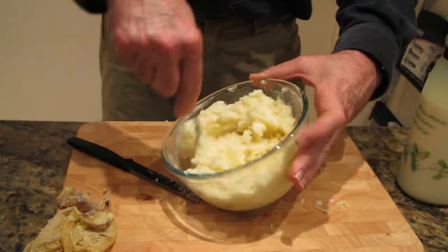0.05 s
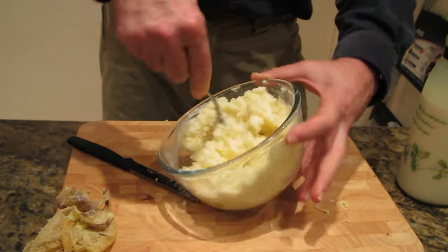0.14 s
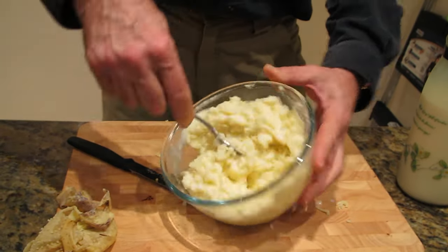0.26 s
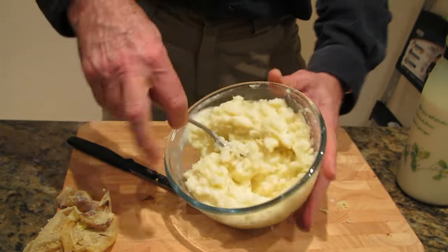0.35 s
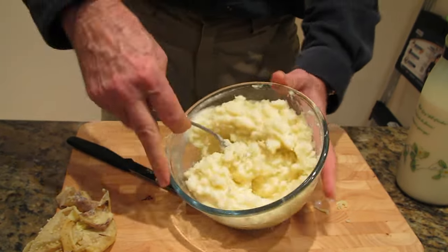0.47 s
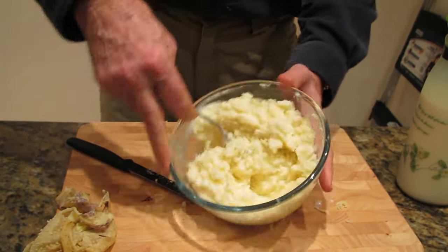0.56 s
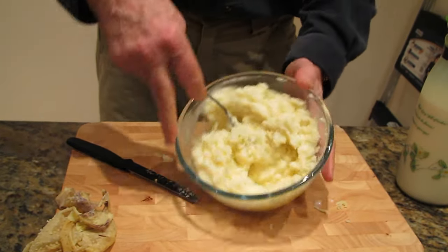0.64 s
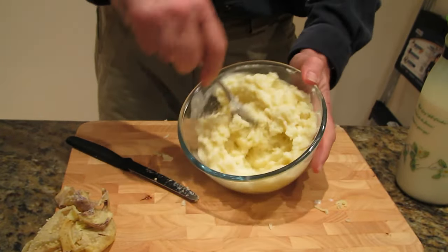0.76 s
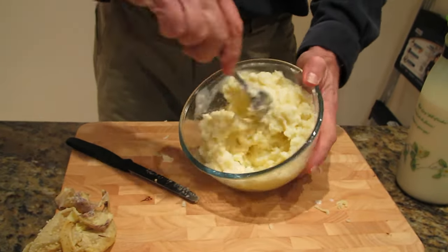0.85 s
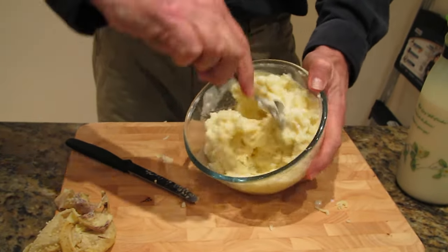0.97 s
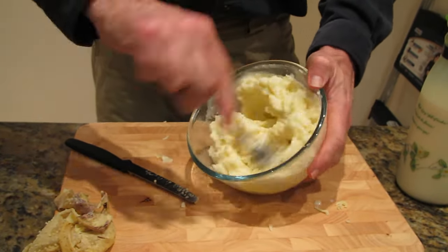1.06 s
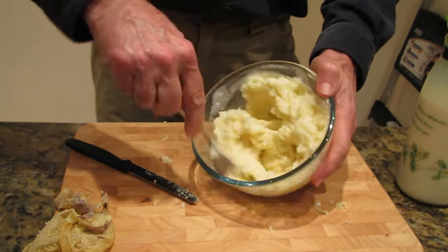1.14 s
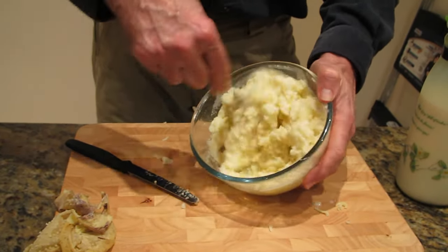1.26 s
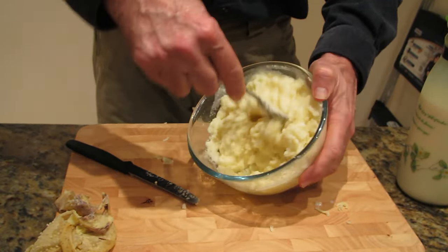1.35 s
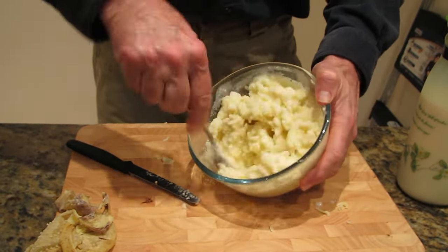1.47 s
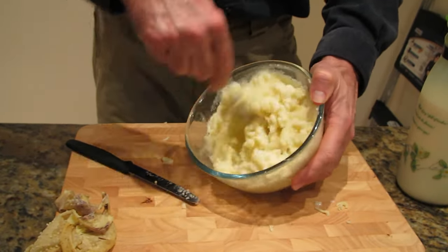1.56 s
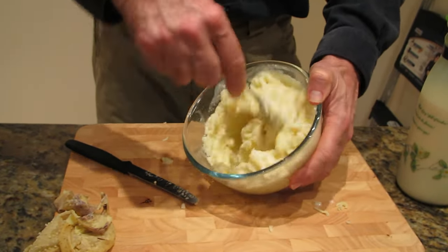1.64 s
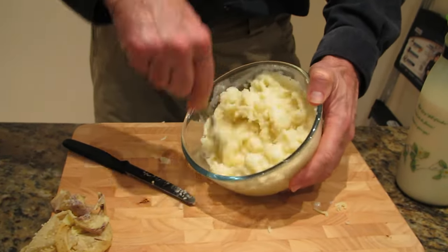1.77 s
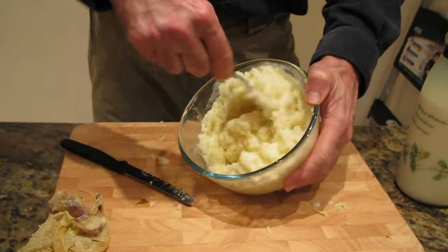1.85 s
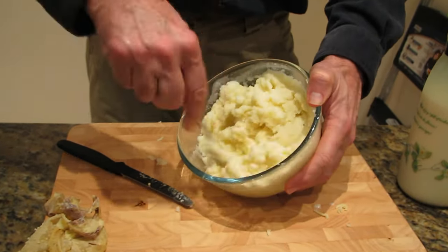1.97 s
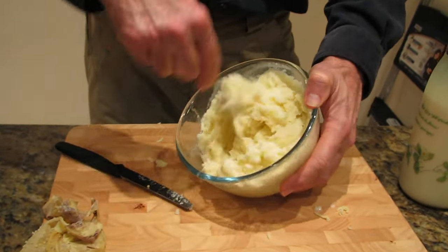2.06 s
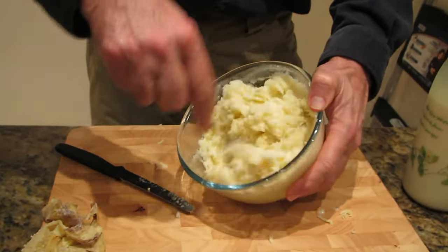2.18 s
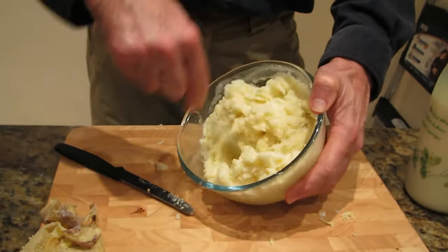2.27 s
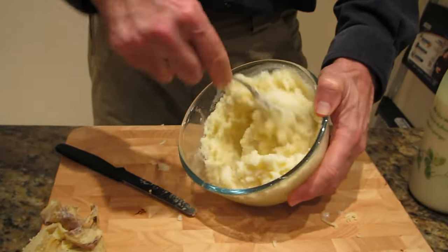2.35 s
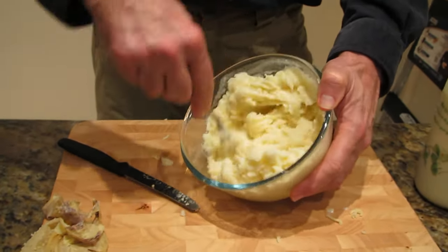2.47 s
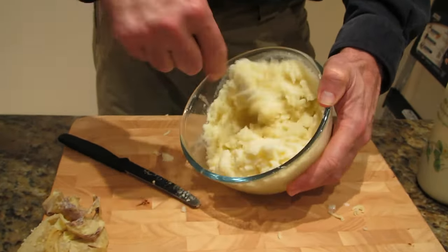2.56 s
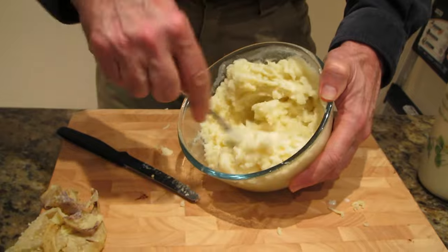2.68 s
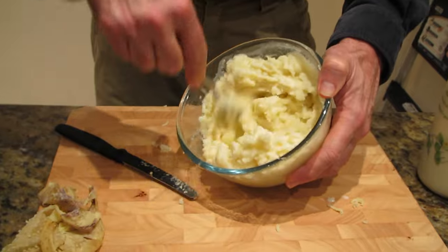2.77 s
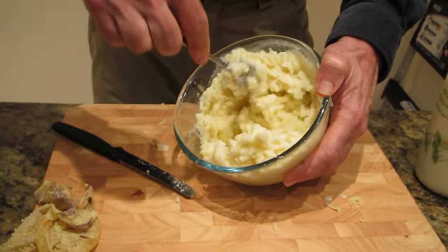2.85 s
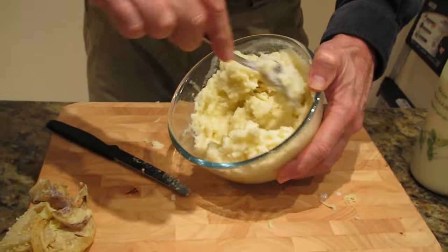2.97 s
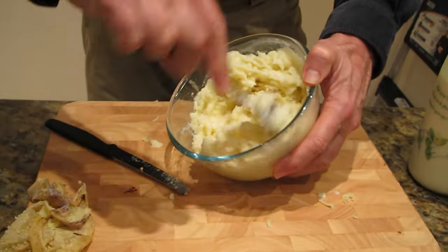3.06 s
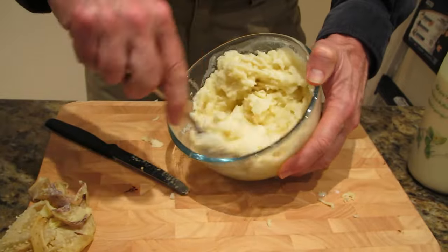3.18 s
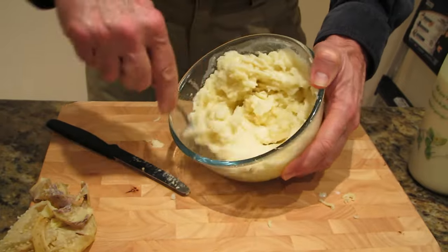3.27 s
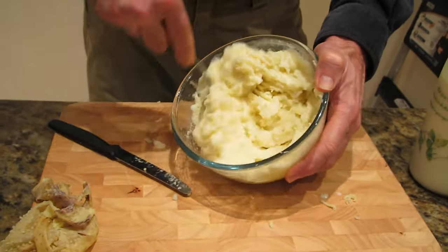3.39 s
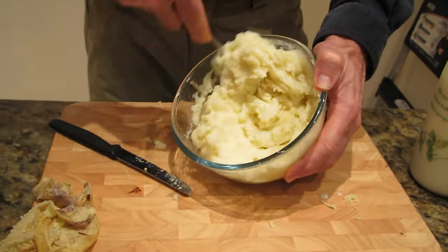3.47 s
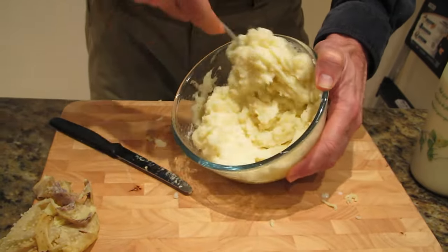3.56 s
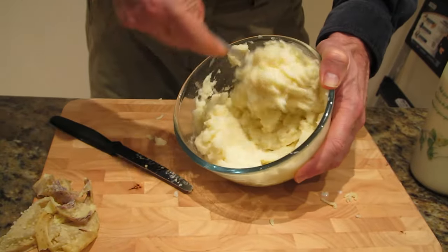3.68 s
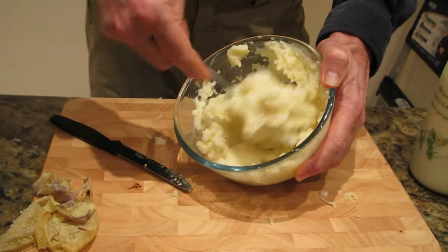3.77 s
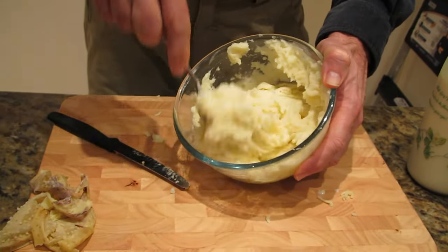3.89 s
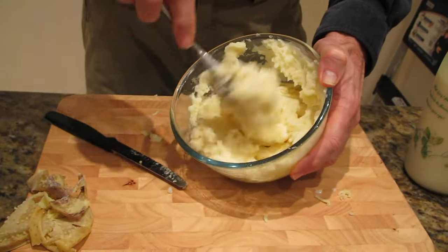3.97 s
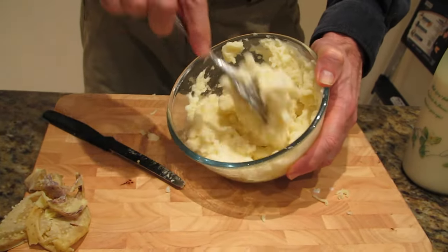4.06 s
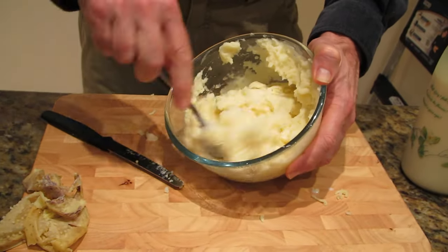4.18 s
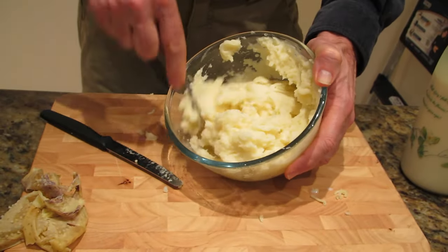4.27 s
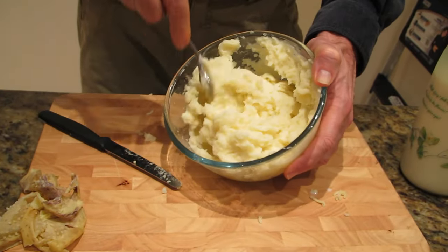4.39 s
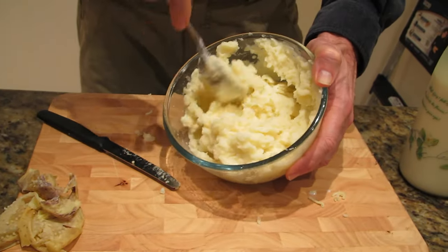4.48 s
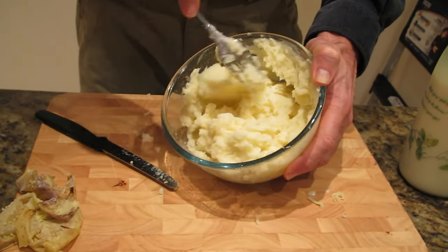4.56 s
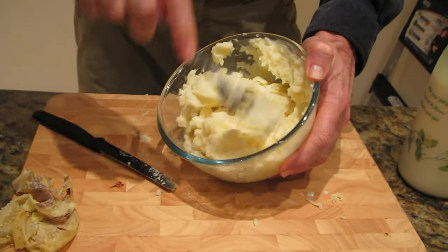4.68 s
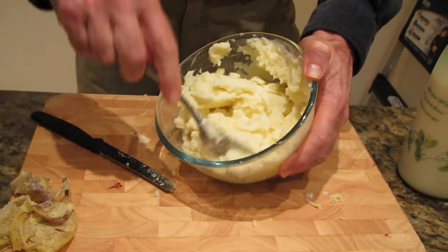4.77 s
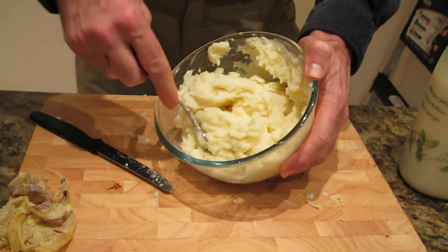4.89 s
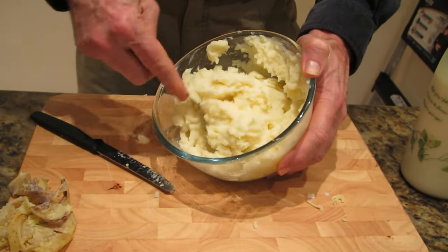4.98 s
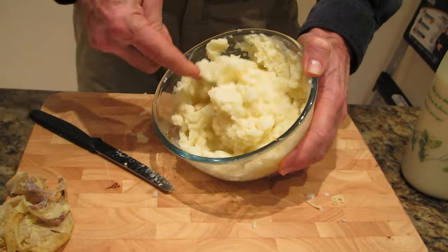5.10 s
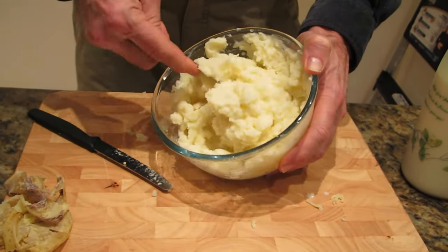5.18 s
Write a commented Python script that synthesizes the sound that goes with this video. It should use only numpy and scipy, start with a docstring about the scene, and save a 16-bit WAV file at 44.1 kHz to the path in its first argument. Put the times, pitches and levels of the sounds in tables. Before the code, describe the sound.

Close view of a fork stirring mashed potato in a glass bowl. Two light clinks open, a brief rumble of the bowl on a wooden board follows, then about fourteen strong, ringing clinks with scrapes come in quick irregular succession. After a short gap, softer knocks and scrapes give way to wet ticks, a small late cluster and one final weak tap. Hard, lively kitchen, faint air noise and hum.

```python
"""In a hard, echoing kitchen with steady air noise and a humming appliance, a steel fork beats mashed potato
in a hand-held glass bowl. Each blow is a short rattle and bite that sets glass and steel ringing.
Scrapes are rough noise sent through the same kind of resonances, with two gliding tones on top.
The mash ticks and crackles with short damped sines; the bowl's foot rolls on a wooden board as bumpy noise.
"""
import sys
import numpy as np
from scipy import signal
from scipy.fft import rfft, irfft, next_fast_len
from scipy.io import wavfile
from scipy.ndimage import map_coordinates

SR = 44100
rng = np.random.default_rng(int(sys.argv[2]) if len(sys.argv) > 2 else 0)


def store_wav(level_fs):
    """Save 16-bit WAV to argv[1]."""
    pcm = np.round(np.clip(np.atleast_2d(level_fs), -1, 1) * 32767)
    wavfile.write(sys.argv[1], SR, pcm.T.astype(np.int16))


N = 230686  # length in samples, about 5.2 s

# Steady noise of the kitchen, its tone: (frequency [Hz], relative level per Hz [dB])
AIR_TONE = [(15, -52), (30, -24), (90, -19), (130, -11.5), (230, -8.5), (500, -7), (760, -3.5), (900, -8),
            (2300, -14), (3300, -18.5), (4500, -33), (9000, -28.5), (16000, -36)]
# How that noise swells a little: (time [s], level [dB])
AIR_SWELL = [(0, -52.5), (.45, -56), (1, -50), (4.6, -53.5), (5.23, -52.5)]
# Hum of the appliance's motor: (frequency [Hz], rms level [dB])
MOTOR_HUM = [(145.3, -68), (199.2, -72), (247.6, -65), (737.5, -69)]
# How alike far sound is at left and right: (frequency [Hz], likeness [0 to 1])
LEFT_RIGHT_LIKENESS = [(100, 0.47), (250, 0.75), (600, 0.83), (2000, 0.62), (4500, 1), (9000, 0.32),
                       (14000, .3)]
# Echoes of the kitchen: (frequency [Hz], time to fall 60 dB [s], echo level [dB])
KITCHEN_ECHO = [(150, 0.19, 4), (470, 0.79, -3), (680, 0.63, 2), (918, 0.69, 0), (1140, 0.54, -0.5),
                (2930, 0.48, -5), (8100, 0.37, -5.5), (14900, 0.42, -9.5)]

# The bowl's foot rolling on the board: (time [s], level [dB])
ROLL_LEVEL = [(.5, -64), (0.559, -40), (.62, -39.5), (.66, -34.5), (.7, -46), (.8, -53.5), (.88, -75),
              (1.0, -69)]
# Jolts of the foot: (time [s], level at the top of the jolt [dB])
JOLTS = [(.395, -48), (0.788, -37)]
JOLT_DB_PER_S = 900  # how fast a jolt comes and goes
# Resonances of the wooden board: (frequency [Hz], width [Hz], level [dB])
BOARD_MODES = [(188, 14, 3.5), (363, 54, 4), (635, 340, -7.5), (910, 197, -5), (1390, 480, -15)]

# Wet ticks as the mash lets go of fork and glass: (time [s], starting level [dB], pitch [Hz])
WET_TICKS = [(0.408, -34.5, 3520), (0.5518, -31.5, 8600), (0.6976, -32, 10000), (0.8843, -34, 5580),
             (0.9662, -36, 9800), (2.879, -31, 7500), (3.111, -17.5, 9700), (3.223, -24, 9100),
             (3.4812, -22, 3380), (3.5112, -20.5, 3100), (3.5259, -21, 10300), (3.534, -32, 4900),
             (3.5727, -23.5, 3180), (3.5853, -26, 9160), (3.612, -22, 7700), (3.665, -29, 7370),
             (3.7322, -31, 9800), (3.7833, -29.5, 3240), (3.8078, -27, 1770), (3.8786, -26, 4100),
             (3.8885, -24, 3800), (3.917, -22.5, 8700), (3.9809, -25, 12100), (4.0263, -26, 8200),
             (4.1056, -34, 10900), (4.1205, -26, 5300), (4.1276, -16.5, 9000), (4.351, -25.5, 3580),
             (4.372, -34, 3480), (4.4722, -35, 9490), (4.658, -42, 2990), (4.6943, -27, 9800),
             (4.751, -22, 11100), (4.7564, -24.5, 8450), (4.8297, -29, 8400), (4.8835, -35, 4450),
             (5.0102, -26, 3000), (5.0602, -28, 5400), (5.13, -30, 5400)]
# Faint wet crackle of the mash: (time [s], level [dB])
CRACKLE_LEVEL = [(0, -65.5), (.9, -66.5), (1.05, -47.5), (2.7, -50.5), (3.0, -66.5), (3.4, -43.5),
                 (3.6, -50), (3.85, -58.5), (4.05, -65), (4.35, -58), (4.5, -61), (4.6, -72), (4.78, -64),
                 (4.85, -50), (4.93, -65.5), (5.03, -48.5), (5.12, -64), (5.23, -57)]

# Resonances of bowl and fork, six groups: (frequency [Hz], width [Hz], level within the group [dB])
BODY_MODES = [(201, 80, -9.5), (351.4, 153, -3.5), (418.7, 77, 1), (462.4, 26.3, -0.5), (561.3, 33, -6)]  # the damped bowl as a whole
BELLY_MODES = [(615, 38, 0), (735, 59, -1.5), (871.6, 76, 0), (1100, 160, -8)]  # lower side of the bowl
WALL_MODES = [(1398, 122, -1), (1885, 265, 0), (2474, 91, 0)]
LIP_MODES = [(2620, 172, -2.5), (3200, 534, -5)]
TINE_MODES = [(4890, 1520, -2), (5210, 365, 3), (6180, 550, -5.5)]
RIM_MODES = [(7750, 5000, -16.5), (9140, 585, -1.5), (9320, 1200, -7.5), (11420, 2640, -13.5),
             (12000, 3170, -10.5)]
# Higher resonances of the fork, heard when it drags: (frequency [Hz], width [Hz], level [dB])
SHANK_MODES = [(7710, 1300, 1.5), (10600, 590, 7.5), (12700, 3700, -6.5)]

# Strokes of the fork along the glass: (start [s], swell [s], fade [s], glass level [dB],
# steel level [dB], hollow level [dB], hollow pitch at start [Hz], hollow pitch at end [Hz])
SCRAPE_STROKES = [(.03, 0.022, 0.16, -72, -61, -55, 892, 800),
                  (1.059, 0.012, 0.032, -40, -64, -36, 912, 900),
                  (1.124, 0.0071, 0.12, -33, -36.5, -42, 1200, 1102),
                  (1.461, 0.02, 0.078, -27, -30, -30.5, 1388, 999),
                  (1.72, 0.029, 0.065, -47.5, -43, -41.5, 754, 699),
                  (1.97, 0.027, 0.12, -31.5, -34, -47, 803, 1210),
                  (2.21, 0.043, 0.064, -30.5, -33.5, -42.5, 1117, 1113),
                  (2.454, 0.026, 0.014, -61, -39, -30.5, 1028, 966),
                  (3.08, 0.043, 0.098, -43.5, -48.5, -45.5, 851, 841),
                  (3.255, 0.034, 0.062, -40, -38, -32.5, 1405, 1012),
                  (3.35, 0.027, 0.19, -37, -46.5, -36.5, 956, 831),
                  (4.14, 0.082, 0.096, -39.5, -40.5, -39, 1097, 1304),
                  (4.8, 0.041, 0.033, -53, -71, -71.5, 800, 800),
                  (4.986, 0.012, 0.09, -48, -63, -55.5, 989, 930)]
# Above this steel level a pressed tine starts lower and ends higher than its resting pitch
TINE_REST_HZ, BEND_FROM_DB, BEND_HZ_PER_DB = 4850, -44, 40
TINE_OVER_SHANK_DB = -0.7

# Fork blows: (start [s], glass level [dB], height on the wall [0 bottom, 1 lip],
# tines level [dB], rim level [dB])
FORK_BLOWS = [(0.022, -21, 0.27, -27.5, -15.5), (0.0611, -28, 0.5, -30.5, -32),
              (1.038, -26.5, .5, -25, -15), (1.0586, -17.5, 0.41, -28.5, -15.5),
              (1.1229, -28, 0.27, -16.5, -19), (1.276, -10, 0.59, -18.5, -6),
              (1.4498, -14, 0.33, -16, -8.5), (1.523, -23, 0.27, -15, -14.5),
              (1.5675, -9.5, 0.53, -39.5, -4), (1.711, -11, 0.074, -12.5, -5.5),
              (1.8252, -7.5, 0.59, -12.5, 6), (1.9611, -12.5, 0.19, -17, -4), (2.0657, -8, 0.7, -38, -7),
              (2.1988, -8, 0.34, -13.5, -1), (2.2895, -19, 0.43, -16.5, -15),
              (2.3079, -11.5, 0.68, -15, -4.5), (2.4387, -8.5, 0.2, -9, -3),
              (2.4405, -12, 0.094, -25, -4.5), (2.5638, -13.5, 0.82, -17, -5), (2.697, -8.5, 0.12, -22, -6),
              (3.053, -31, 0.43, -35, -19.5), (3.0691, -24.5, 0.205, -18.5, -13.5),
              (3.107, -37, 1, -25, -23), (3.1613, -33.5, 0.69, -22, -23),
              (3.191, -24.5, 0.85, -15.5, -26.5), (3.253, -23, 0.4, -14.5, -16.5),
              (3.289, -22.5, 0.44, -21, -27), (3.323, -33, 0.37, -32, -38),
              (3.3816, -13.5, 0.66, -22.5, -45), (3.4086, -21.5, 0.38, -25, -49.5),
              (3.5531, -29, 0.41, -26.5, -24), (4.1355, -22.5, 0.16, -13, -8), (4.204, -31, 0.37, -30, -31),
              (4.254, -29, 0.47, -21.5, -23.5), (4.9995, -32, 0.65, -37, -36)]
# Level of a group above the glass level, one row each for wall, lip, body and belly:
# (for a blow at the bottom [dB], for a blow at the lip [dB])
LEVEL_BY_HEIGHT = [(2, -7), (-7.5, 3.5), (0, -33.5), (-1.05, -25.5)]
RATTLE_S = 0.0049  # the rattle loses 20 dB in this time

# Balance of the nearby bowl: (frequency [Hz], left minus right [dB])
SIDE_LEAN = [(300, 0), (1000, -1.5), (3000, -1), (5000, 0), (9000, 2), (14000, -0.5)]
# The microphone's colour: (frequency [Hz], gain [dB])
MIC_COLOUR = [(3300, 1.5), (3900, -0.5), (5000, 1.5), (6000, -1), (6700, -3.5), (7500, 0.5), (9200, 3.5),
              (11000, 3.5), (14000, -4)]
TOP_HZ = 16600  # nothing passes above this


def amp(db):
    """Turn decibels into gain."""
    return 10 ** (np.asarray(db) / 20)


def unit(x):
    """Bring a sound to an rms of 1."""
    return x / np.sqrt(np.mean(x ** 2) + 1e-20)


def along(points, hz, column=1):
    """Read a table between its points, with frequency on a log axis."""
    table = np.transpose(points)
    return np.interp(np.log(hz + 1), np.log(table[0] + 1), table[column])


def curves(rows):
    """Draw one smooth line of values, sample by sample, for each column after the time."""
    times, *columns = np.transpose(rows)
    return [np.interp(np.arange(N) / SR, times, column) for column in columns]


def filtered(x, response):
    """Change each frequency of a sound by a gain, which may be complex to shift its phase."""
    length = x.shape[-1]
    padded = next_fast_len(length + 8192)
    spectrum = rfft(x, padded) * response(np.fft.rfftfreq(padded, 1 / SR))
    return irfft(spectrum, padded)[..., :length]


def ringing(x, modes, scatter_db=0):
    """Pass a push through resonances that each ring at their own pitch; scatter varies their strength."""
    extra_db = scatter_db * rng.standard_normal(len(modes))

    def response(f):
        total = 0
        for k, (centre, width, db) in enumerate(modes):
            resonance = 1j * f * width / (centre * centre - f * f + 1j * f * width)
            total = total + (-1) ** k * amp(db + extra_db[k]) * resonance  # signs alternate
        return total

    return filtered(x, response)


def gliding(x, half_width_hz, span, from_hz, to_hz):
    """Make a moving resonance: the slow part of a noise rides on a gliding tone."""
    slow = unit(filtered(x[span], lambda hz: 1 / (1 + (hz / half_width_hz) ** 2)))
    pitch = np.linspace(from_hz, to_hz, len(slow))
    return np.sqrt(2) * slow * np.sin(2 * np.pi * np.cumsum(pitch) / SR)


def spread(pair):
    """Mix two unrelated sounds until left and right are as alike as far sound is."""
    def mix(hz):
        angle = np.arccos(np.clip(along(LEFT_RIGHT_LIKENESS, hz), -1, 1)) / 2
        return np.array([np.cos(angle), np.sin(angle)])

    mid, side = filtered(pair, mix)
    return np.array([mid + side, mid - side])


def grit(bumpy_db, grain_s):
    """Make noise whose size changes from grain to grain, as a rough contact slips."""
    knots = rng.standard_normal(int(N / SR / grain_s) + 4)
    grains = map_coordinates(knots, [np.arange(N) / SR / grain_s])
    size_db = 2 * bumpy_db * np.tanh(grains / 2)
    return rng.standard_normal(N) * amp(size_db)


def background():
    """Steady air noise plus motor tones whose phase wanders, so they are slightly unsteady."""
    t = np.arange(N) / SR
    hum = 0
    for hz, db in MOTOR_HUM:
        wander = np.cumsum(0.0034 * rng.standard_normal(N))
        hum = hum + amp(db) * np.sqrt(2) * np.sin(2 * np.pi * hz * t + wander)
    noise = spread(rng.standard_normal((2, N)))
    air = filtered(noise, lambda hz: amp(along(AIR_TONE, hz)))
    return hum + amp(curves(AIR_SWELL)[0]) * unit(air)


def kitchen(x, size=8192):
    """Each frequency dies at its own speed; for the moving bowl, each 0.19 s piece gets new echoes."""
    out = np.zeros((2, N + 2 * SR))
    for start in range(0, N, size):
        noise = rng.standard_normal((2, SR * 3 // 4))
        hz, t, cells = signal.stft(noise, SR, nperseg=256)
        fading = amp(-60 * t / along(KITCHEN_ECHO, hz)[:, None])
        tail = spread(signal.istft(cells * fading, SR, nperseg=256)[1])
        tail = tail / np.linalg.norm(tail[0])
        wet = signal.fftconvolve(x[None, start:start + size], tail, axes=1)
        out[:, start + 150:][:, :wet.shape[1]] += wet  # echoes begin 150 samples late
    return out[:, :N]


def roll():
    """The glass foot bumps over the grain of the wood and makes the board ring."""
    t = np.arange(N) / SR
    touching = (t > ROLL_LEVEL[0][0]) * (t < ROLL_LEVEL[-1][0])
    rolling = amp(curves(ROLL_LEVEL)[0]) * touching
    jolts = sum(amp(db - JOLT_DB_PER_S * np.abs(t - s)) for s, db in JOLTS)
    bumps = grit(bumpy_db=5, grain_s=.006)
    return (rolling + jolts) * unit(ringing(bumps, BOARD_MODES))


def pops(s, db, hz, cycles):
    """Bursting pockets of air: sines that die away within a few cycles."""
    t = np.arange(256) / SR
    fading = np.exp(-t * hz[:, None] / cycles)
    wave = amp(db)[:, None] * np.sin(2 * np.pi * hz[:, None] * t) * fading
    at = np.round(s * SR).astype(int)[:, None] + np.arange(256)
    return np.bincount(at.ravel(), wave.ravel(), N + SR)[:N]  # add each pop at its place


def mash(count=1000):
    """Wet mash: clear ticks over a scatter of tiny pops and a fine sizzle."""
    s, db, hz = np.transpose(WET_TICKS)
    when, size, pitch = rng.random((count, 3)).T
    tiny_db = -3.3 * np.log(1 - size)  # most are weak, a few much stronger
    tiny = pops(when * N / SR, tiny_db, 4500 * 2.8 ** pitch, cycles=1.8)
    rough = grit(bumpy_db=3, grain_s=.004)
    sizzle = filtered(rough, lambda hz: hz / (hz + 5000) / (1 + (hz / 12000) ** 4))
    crackle = .85 * unit(tiny) + .5 * unit(sizzle)
    return pops(s, db, hz, cycles=1.9) + amp(curves(CRACKLE_LEVEL)[0]) * crackle


def scrape():
    """Dense slips drive glass and fork; a pressed tine and the hollow between mash and wall glide."""
    out, t = np.zeros(N), np.arange(N) / SR
    slips = grit(bumpy_db=6, grain_s=.0025)
    wall = unit(ringing(slips, WALL_MODES + LIP_MODES))
    shank = unit(ringing(slips, SHANK_MODES))
    for s, swell, fade, glass_db, steel_db, hollow_db, from_hz, to_hz in SCRAPE_STROKES:
        span = slice(round(s * SR), round((s + swell + fade) * SR))
        angle = np.interp(t[span] - s, [0, swell, swell + fade], [0, np.pi / 2, np.pi])
        force = np.sin(angle) ** 2  # rises through the swell, falls through the fade
        bend_hz = BEND_HZ_PER_DB * max(steel_db - BEND_FROM_DB, 0)
        tine = gliding(slips, 330, span, TINE_REST_HZ - bend_hz, TINE_REST_HZ + bend_hz)
        hollow = gliding(slips, 140, span, from_hz, to_hz)
        glass_sound = amp(glass_db) * wall[span]
        steel_sound = amp(steel_db) * (shank[span] + amp(TINE_OVER_SHANK_DB) * tine)
        out[span] += force * (glass_sound + steel_sound + amp(hollow_db) * hollow)
    return out


def blows(bite=24):
    """The tines rattle, bite half a millisecond in and rattle out; six groups of resonances ring."""
    out, t = np.zeros(N + SR), np.arange(8192) / SR
    groups = (WALL_MODES, LIP_MODES, BODY_MODES, BELLY_MODES, TINE_MODES, RIM_MODES)
    bottom_db, lip_db = np.transpose(LEVEL_BY_HEIGHT)
    for s, glass_db, height, tines_db, rim_db in FORK_BLOWS:
        contact = amp(-18) * rng.standard_normal(len(t)) * amp(-20 * t / RATTLE_S)
        contact[round(bite)] = 1
        bowl_db = glass_db + bottom_db + np.clip(height, 0, 1) * (lip_db - bottom_db)
        for modes, db in zip(groups, [*bowl_db, tines_db, rim_db]):
            # each group takes only its own part of the blow
            low, high = modes[0][0], modes[-1][0]
            push = ringing(contact, [((low * high) ** .5, 2.37 * (high - low), 0)])
            ring = ringing(push, modes, scatter_db=1.43)
            out[round(s * SR):][:len(t)] += amp(db) * ring / np.abs(ring).max()
    return out[:N]


def scene():
    """Place the bowl near and a little off the middle, with little deep bass, and add echoes and noise."""
    bowl = blows() + mash() + scrape() + roll()
    bowl = filtered(bowl, lambda hz: (1j * hz / (110 + 1j * hz)) ** 3)
    # a faint deep thump goes with loud knocks
    thump = filtered(np.abs(bowl), lambda hz: hz / (8 + hz) / (1 + (hz / 90) ** 2))
    bowl += amp(-32.5) * thump

    sides = np.array([[1], [-1]])  # left, right

    def to_sides(hz):
        shift = np.exp(sides * 1j * hz * 4e-5)  # left comes about 13 millionths of a second earlier
        return amp(sides * along(SIDE_LEAN, hz) / 2) * shift

    near = filtered(bowl, to_sides)
    into_room = filtered(bowl, lambda hz: amp(along(KITCHEN_ECHO, hz, column=2)))
    return near + kitchen(into_room) + background()


def record(dry):
    """The microphone colours the sound, the converter clips at full scale, the highest treble is cut."""
    coloured = filtered(dry, lambda hz: amp(along(MIC_COLOUR, hz)))
    heard = np.clip(coloured, -1, 1)
    return filtered(heard, lambda hz: (hz < TOP_HZ) / (1 + (hz / 15700) ** 40))


dry = scene()
out = record(dry)
store_wav(out)
```